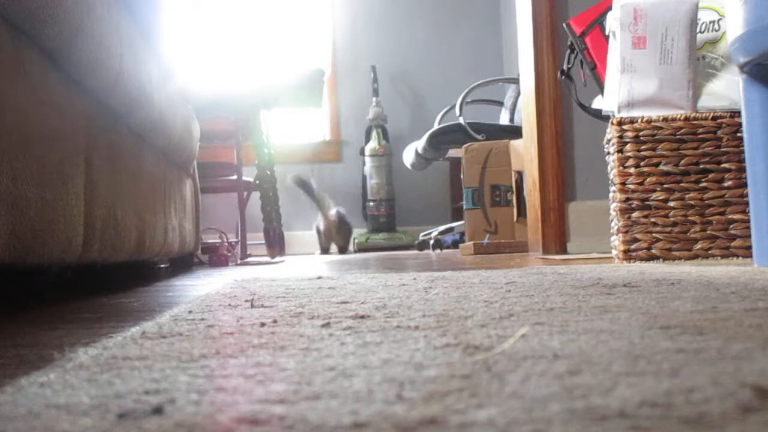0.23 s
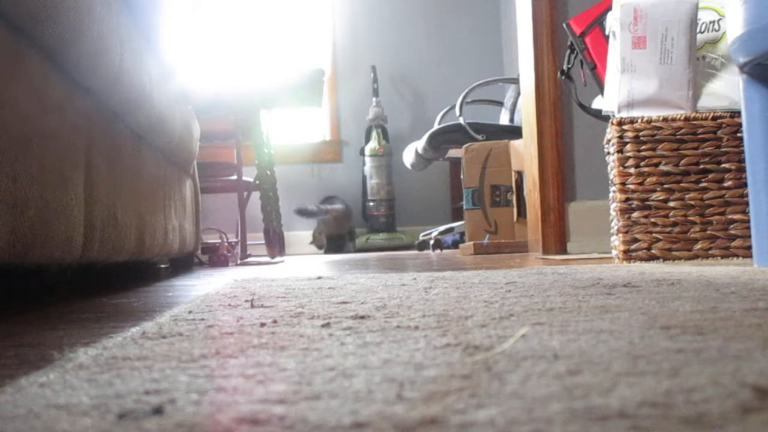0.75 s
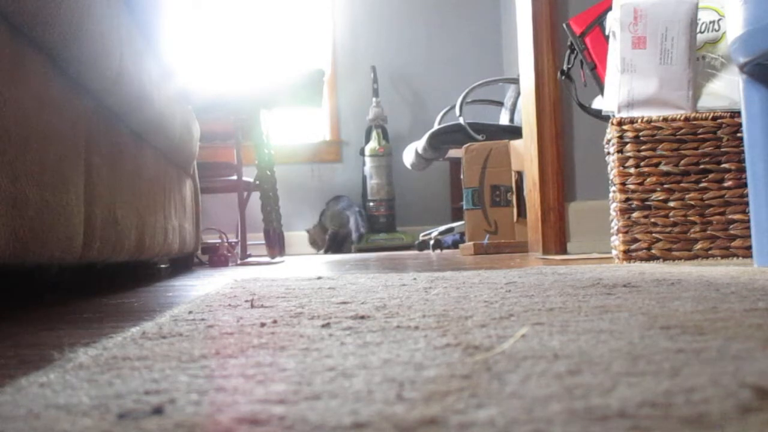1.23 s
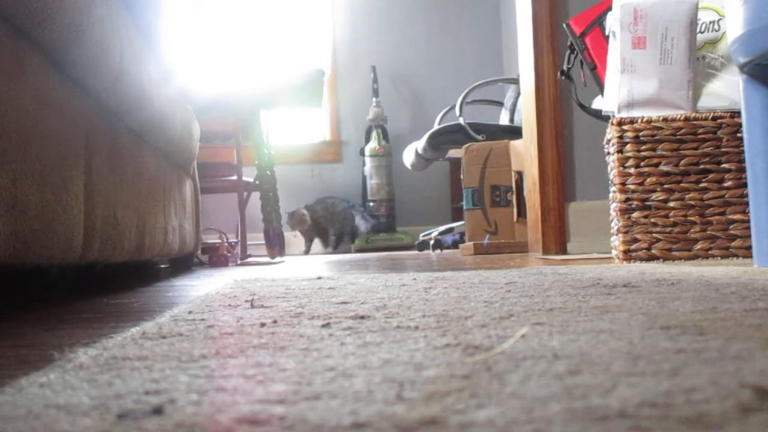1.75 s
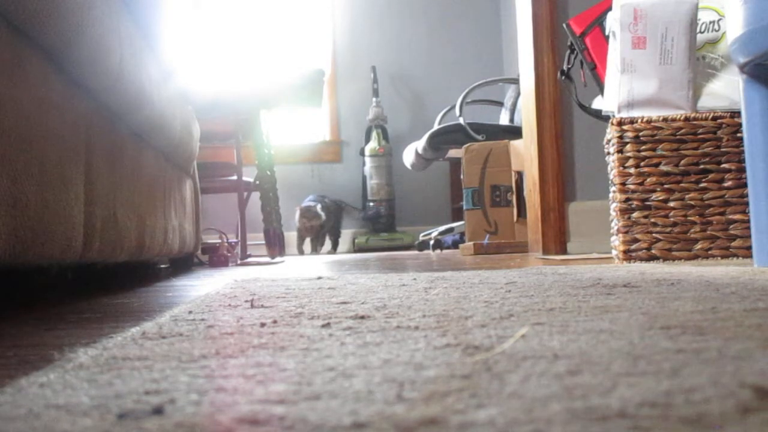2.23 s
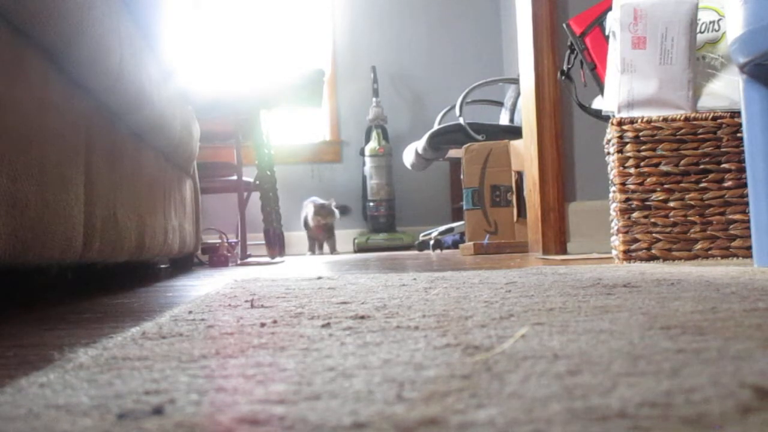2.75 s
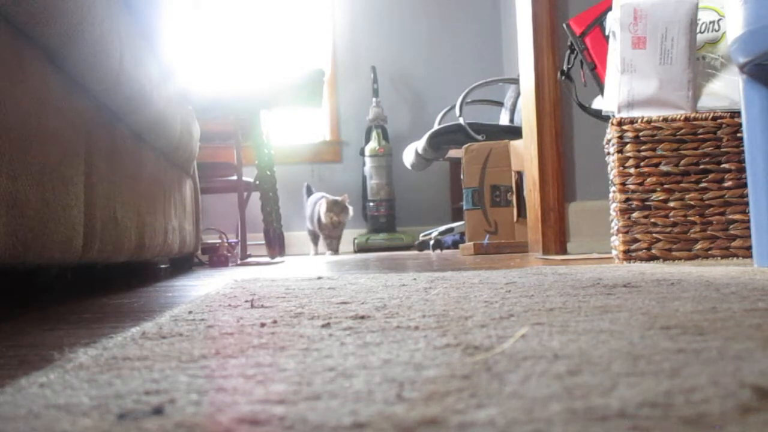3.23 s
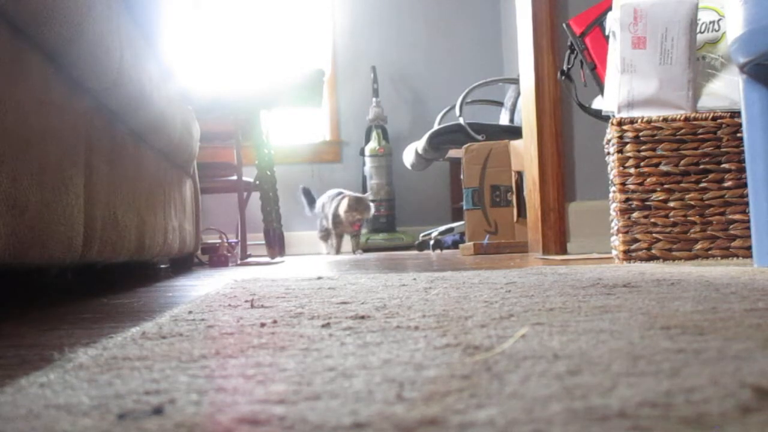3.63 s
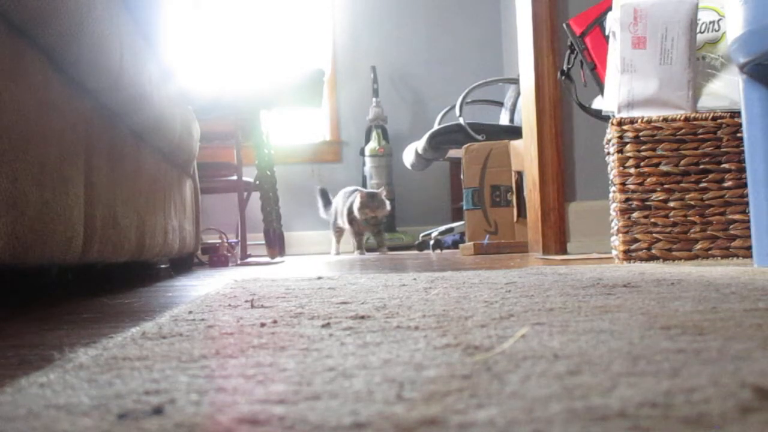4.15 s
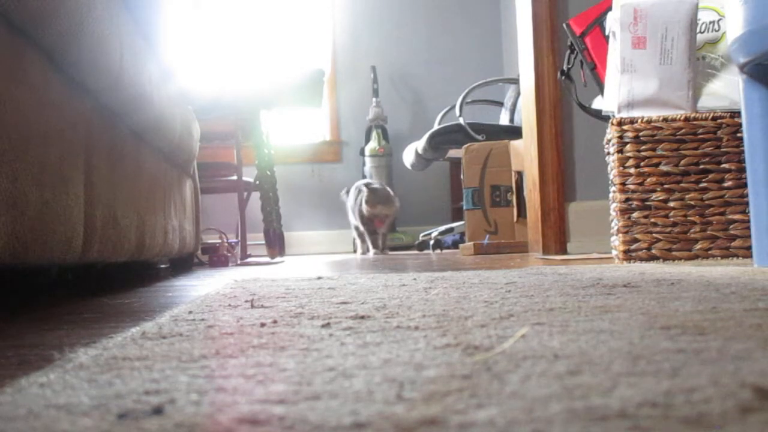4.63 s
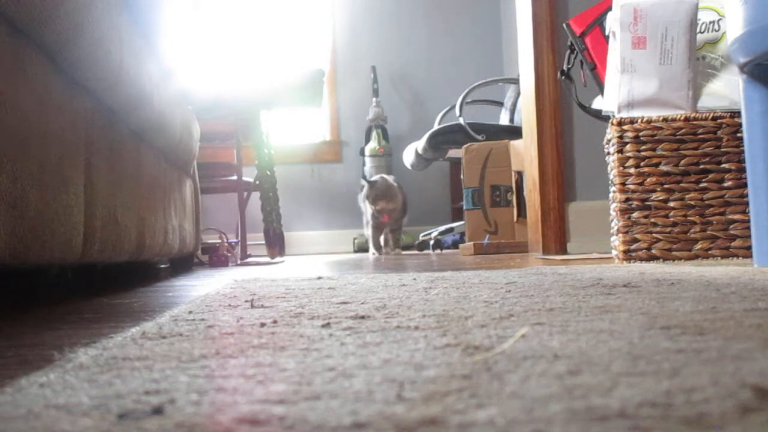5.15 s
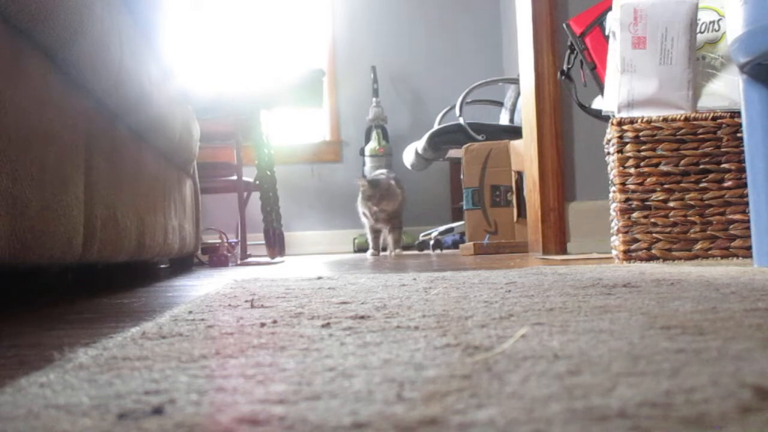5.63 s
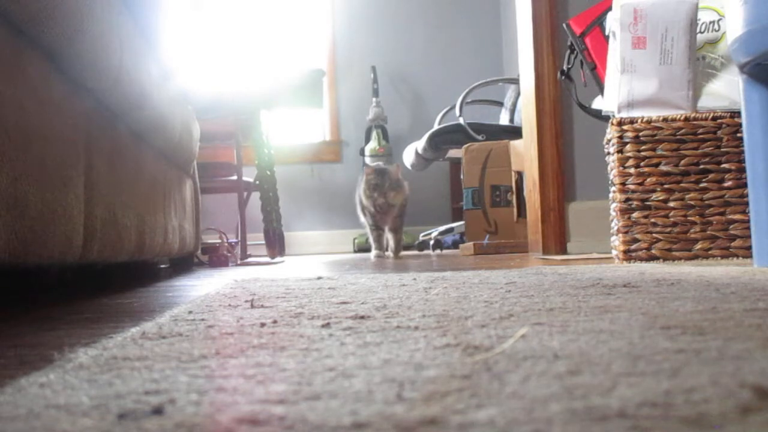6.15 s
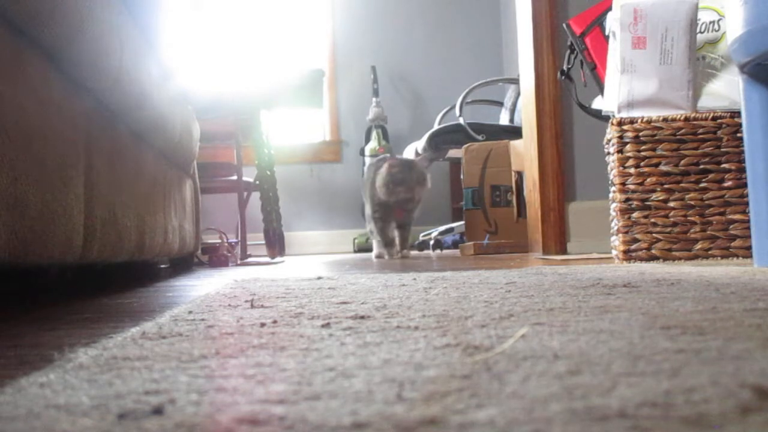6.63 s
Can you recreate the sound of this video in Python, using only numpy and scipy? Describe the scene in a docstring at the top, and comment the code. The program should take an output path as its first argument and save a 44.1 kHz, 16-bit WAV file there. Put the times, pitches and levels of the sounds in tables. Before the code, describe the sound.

Close to the microphone, a hand brushes off its case with a short dry rustle, and the case knocks softly onto carpet within the first half second. A quiet room follows, with a steady low appliance hum. A cat's padded paws make faint, low, irregular thuds on a wooden floor. Outside, a bird gives small falling chirps and an insect pulses thinly, very high and nearly even.

```python
"""A hand brushes off a microphone's case with a short rustle, and the case settles on the carpet with a soft thump.
A cat then pads closer over a wooden floor, each paw a faint low thud under the hum of an appliance.
From outside come a few falling bird chirps and the thin, nearly even pulsing of an insect.
Rubbing is clumpy noise, thuds are fading rings, the hum is a stack of tones, and chirps are gliding tones."""
import sys
import numpy as np
from scipy import signal
from scipy.fft import rfft, irfft
from scipy.io import wavfile

SR = 44100
rng = np.random.default_rng(int(sys.argv[2]) if len(sys.argv) > 2 else 0)


def generate_wav(signal):
    """Clip the signal to [-1, 1] and save it as 16-bit WAV at the path in sys.argv[1]."""
    frames = np.transpose(np.atleast_2d(signal))
    scaled = np.clip(frames, -1, 1) * 32767
    pcm = np.round(scaled).astype(np.int16)
    wavfile.write(sys.argv[1], SR, pcm)


N = 303408
TIME = np.arange(N) / SR   # seconds

# low rumble of the room's still air: pitch_hz, level_db_per_hz
RUMBLE_SPECTRUM = [(12, -74), (22, -63.5), (50, -64.5), (80, -65), (140, -70), (220, -71.5), (340, -74.5),
                   (430, -76), (500, -81.5), (570, -86), (660, -84.5), (755, -96), (830, -90), (1000, -110)]
# soft hiss of the room's still air: pitch_hz, level_db_per_hz
HISS_SPECTRUM = [(760, -108), (900, -93), (980, -84), (1120, -88.5), (1400, -87.5), (1650, -89),
                 (2150, -87.5), (2600, -91.5), (3050, -97), (3900, -96), (5200, -100), (7200, -99),
                 (11000, -104.5), (16000, -114)]
# tones of the appliance motor: multiple_of_speed, rms_level_db
MOTOR_TONES = [(1, -66.5), (2, -50.5), (3, -59.5), (4, -56), (5, -55.5), (6, -55), (7, -53.5), (8, -64),
               (9, -72.5)]
# bird calls: start_s, level_db, first_note_accent_db
BIRD_CALLS = [(.024, -54, -7), (1.054, -54, -1), (1.962, -59, -6), (2.838, -58, -3), (4.049, -55.5, 7)]
# notes of one call: after_start_s, pitch_hz, level_db, fall_hz_per_s, half_length_s, rasp_radians
BIRD_NOTES = [(.014, 4020, 0, 6000, .012, .5), (.040, 3540, 0, 7000, .014, 1.1),
              (.078, 3330, 0, 6000, .013, .9), (.104, 2980, -9, 9000, .012, 1.4)]
# paws on the boards: start_s, peak_db
PAW_STEPS = [(2.498, -28), (2.66, -30), (2.788, -29.5), (2.939, -36), (3.029, -33), (3.542, -35),
             (4.163, -28), (5.735, -29), (5.768, -33), (6.015, -32), (6.308, -33), (6.407, -25.5)]
# ringing of the floor boards: pitch_hz, level_db, fade_by_60_db_s
BOARD_MODES = [(30, 4, 0.039), (51, 3, 0.049), (72.6, -8, 0.053), (120, -10.5, 0.044)]
# the case rocking and settling: start_s, peak_db, contact_s
CASE_KNOCKS = [(.001, -37, 0.0076), (.039, -26, 0.01), (.264, -21.5, 0.0079), (.305, -26, 0.0065),
               (.4625, -23, 0.00049), (.471, -19, 0.0013), (.484, -13, 0.0049), (.502, -19.5, 0.0013),
               (.512, -20, 0.0056), (.557, -28.5, 0.0029)]
# ringing of the case on the floor: pitch_hz, level_db, fade_by_60_db_s
CASE_RINGS = [(88.2, -7, 0.31), (119, 0, 0.043), (170.4, 0, 0.067), (236, -1, 0.075), (319, -1, 0.077),
              (402, -9, 0.096), (483, -8, .08), (590, -10.5, 0.082), (664, -13, 0.037)]
# fingers catch the edge of the case and slip off: start_s, level_db
EDGE_CATCHES = [(.022, -49), (.199, -34)]
# what the scraped edge rings with: pitch_hz, width_hz, level_db
EDGE_RINGS = [(7330, 680, 0), (7700, 740, 6.5), (10650, 600, -1), (11900, 360, 1), (12650, 700, -8),
              (15000, 1000, -5)]
# hollow of the case under the last scuff: pitch_hz, width_hz, level_db
SCUFF_RINGS = [(2060, 350, -2), (2580, 400, -2), (3780, 510, -2), (6100, 530, -4)]
# the hand slides over the case: start_s, length_s, level_db
HAND_SLIDES = [(.002, 0.11, -51.5), (0.201, 0.073, -38.5), (0.286, 0.21, -36.5)]
# tone colour of the sliding friction: pitch_hz, relative_level_db_per_hz
SLIDE_SPECTRUM = [(500, -14), (900, -11), (1400, -10.5), (2000, -5), (2600, 0), (3100, -6.5), (3800, 0.5),
                  (5200, -5), (6500, -1), (9500, -3.5), (11500, -9.5), (13200, -15), (16000, -20)]
# the hand's weight bears on the case: start_s, length_s, level_db
HAND_PRESSES = [(.002, .06, -30.5), (.195, .01, -31), (0.269, .05, -30), (0.501, .02, -29),
                (.675, .01, -36.5)]
# tone colour of the handling rumble: pitch_hz, relative_level_db_per_hz
PRESS_SPECTRUM = [(15, 7), (40, -8.5), (85, 4), (130, -4.5), (200, -10.5), (350, -17.5), (600, -29),
                  (1200, -58)]


def from_db(db):
    """Turn decibels into a gain."""
    return 10 ** (np.asarray(db) / 20)


def rms_one(x):
    """Scale a sound to an average (rms) level of 1."""
    return x / np.sqrt(np.mean(x ** 2) + 1e-20)


def coloured(x, spectrum):
    """Give white noise of unit rms a spectrum in dB per Hz, falling steeply past both ends."""
    hz, db = np.transpose(spectrum)
    octave = np.log2(np.maximum(np.fft.rfftfreq(N, 1 / SR), 1))
    inside = np.clip(octave, np.log2(hz[0]), np.log2(hz[-1]))
    octaves_outside = np.abs(octave - inside)
    level_db = np.interp(octave, np.log2(hz), db) - 40 * octaves_outside
    return irfft(rfft(x) * from_db(level_db), N) * np.sqrt(SR / 2)


def noise_band(hz, width_hz):
    """Noise in one bell-shaped band around a pitch; unit rms."""
    bell = np.exp(-2 * ((np.fft.rfftfreq(N, 1 / SR) - hz) / width_hz) ** 2)
    return rms_one(irfft(rfft(rng.standard_normal(N)) * bell, N))


def drift(rate):
    """Smooth random wandering, changing about rate times a second; unit rms."""
    return noise_band(0, 2 * rate)


def resonance(x, hz, width_hz):
    """A two-pole resonance: it favours one pitch, with a gain of 1 at its top."""
    r = np.exp(-np.pi * width_hz / SR)
    feed = np.array([1, 0, -1]) * (1 - r * r) / 2
    feedback = [1, -2 * r * np.cos(2 * np.pi * hz / SR), r * r]
    return signal.lfilter(feed, feedback, x)


def envelope(start, length, db, attack_s, release_db_per_s, sag_db_per_s=0):
    """Gain over time: a smooth attack ending at start, a hold that may sag, then a release."""
    t = TIME - start
    attack = np.sin(np.pi / 2 * np.clip(1 + t / attack_s, 0, 1)) ** 2
    sag_db = sag_db_per_s * np.clip(t, 0, length)
    release_db = release_db_per_s * np.maximum(t - length, 0)
    return attack * from_db(db - sag_db - release_db)


def bump(s, half_length_s):
    """A bell-shaped swell of height 1 around a moment."""
    return np.exp(-((TIME - s) / half_length_s) ** 2)


def blows(rows, modes, vary_db):
    """Soft contacts ring a body; a longer contact leaves out its higher modes."""
    out, t = np.zeros(N + SR), TIME[:SR // 2]
    hz, db, t60 = np.transpose(modes)
    sign = (-1) ** np.arange(len(modes))   # neighbouring modes swing in opposite directions
    fades = np.exp(-np.log(1000) * t / t60[:, None])
    rings = np.sin(2 * np.pi * hz[:, None] * t) * fades
    chances = rng.standard_normal((len(rows), len(modes)))
    for (s, peak_db, contact), chance in zip(rows, chances):
        push = np.sin(np.pi * np.minimum(t / contact, 1)) ** 2
        ringing = (sign * from_db(db + vary_db * chance)) @ rings
        blow = signal.fftconvolve(ringing, push)[:len(t)]
        start = max(round(s * SR), 0)
        out[start:start + len(t)] += from_db(peak_db) * blow / np.abs(blow).max()
    return out[:N]


def friction(grain_db, grains_per_s):
    """Countless tiny slips that come in clumps: white noise of unsteady level; unit rms."""
    return rms_one(rng.standard_normal(N) * from_db(grain_db * drift(grains_per_s)))


def rubbed(modes):
    """Friction makes a set of modes ring, each filtered twice for a sharper peak; unit rms."""
    slips = friction(grain_db=2.5, grains_per_s=270)
    rings = 0
    for hz, width_hz, db in modes:
        once = resonance(slips, hz, width_hz)
        rings = rings + from_db(db) * resonance(once, hz, width_hz)
    return rms_one(rings)


def room_air():
    """Steady rumble and hiss, and a deep drone that swells up in the building and eases."""
    rumble = coloured(rng.standard_normal(N), RUMBLE_SPECTRUM)
    hiss = coloured(rng.standard_normal(N), HISS_SPECTRUM)
    drone_gain = envelope(5.35, 0, db=-45, attack_s=.7, release_db_per_s=3.5)
    drone = drone_gain * noise_band(55.2, width_hz=12)
    swell = from_db(-44) * bump(7.2, half_length_s=0.08) * noise_band(251, width_hz=49)
    return rumble + hiss + drone + swell


def appliance(motor_hz=59.24, wander_hz=0.1041, waver_db=0.75, mains_hum_hz=120.74):
    """A motor slips just behind the mains, so its second harmonic beats with the hum; its fan blurs a tone."""
    turns = np.cumsum(motor_hz + wander_hz * drift(1.7)) / SR
    motor = 0
    for multiple, db in MOTOR_TONES:
        gain = from_db(db + waver_db * drift(1.4))
        motor = motor + gain * np.sin(2 * np.pi * (round(multiple) * turns + rng.random()))
    mains = from_db(-49.5) * np.sin(2 * np.pi * (mains_hum_hz * TIME + rng.random()))
    fan = from_db(-58) * noise_band(273.1, width_hz=5)
    return np.sqrt(2) * (motor + mains) + fan   # the root of 2 turns rms levels into sine heights


def insect(period_s=.17536, jitter_s=.008, vary_db=1, stroke_half_length_s=0.039):
    """Each wing stroke rasps a narrow, very high resonance, a little off in time and strength."""
    beats = np.arange(.637, N / SR, period_s)
    chances = rng.standard_normal((len(beats), 2))
    strokes = 0
    for s, (late, push) in zip(beats, chances):
        stroke = bump(s + jitter_s * late, stroke_half_length_s)
        strokes = strokes + from_db(vary_db * push) * stroke
    return from_db(-72) * strokes * noise_band(10450, width_hz=280)


def bird(echo_t60_s=0.13, echo_db=-4):
    """A distant call steps down through four short, raspy, falling notes, blurred by reflections."""
    song, flutter = np.zeros(N), drift(130)
    for s, call_db, accent_db in BIRD_CALLS:
        for k, (after, hz, note_db, fall, half_length, rasp) in enumerate(BIRD_NOTES):
            t = TIME - s - after
            near = np.abs(t) < half_length * np.pi   # only compute where the note is heard
            t = t[near]
            phase = 2 * np.pi * (hz - fall * t / 2) * t + rasp * flutter[near]
            gain = from_db(call_db + note_db + accent_db * (k == 0))
            song[near] += gain * np.exp(-(t / half_length) ** 2) * np.sin(phase)
    echo_fade = np.exp(-np.log(1000) * TIME[:SR // 2] / echo_t60_s)
    echoes = rng.standard_normal(SR // 2) * echo_fade
    echoes = echoes / np.linalg.norm(echoes)
    return song + from_db(echo_db) * signal.fftconvolve(song, echoes)[:N]


def cat(pad_contact_s=0.0073):
    """Padded paws press slowly, so mainly the lowest modes of the boards answer."""
    steps = [(s, db, pad_contact_s) for s, db in PAW_STEPS]
    return blows(steps, BOARD_MODES, vary_db=1.5)


def strongest(envelopes):
    """Follow whichever gain is highest at each moment."""
    return np.max(envelopes, axis=0)


def hand():
    """Skin catches the edge of the case and slides off it, while the case rumbles and knocks on the floor."""
    catching = strongest([envelope(s, 0, db, attack_s=.016, release_db_per_s=340)
                          for s, db in EDGE_CATCHES])
    sliding = strongest([envelope(*row, attack_s=0.021, release_db_per_s=210, sag_db_per_s=38)
                         for row in HAND_SLIDES])
    pressing = strongest([envelope(*row, attack_s=0.023, release_db_per_s=148)
                          for row in HAND_PRESSES])
    # a last, duller scuff as the hand lets go
    letting_go = envelope(.45, 0, db=-40, attack_s=0.015, release_db_per_s=290)
    scrapes = catching * rubbed(EDGE_RINGS) + letting_go * rubbed(SCUFF_RINGS)
    brush = rms_one(coloured(friction(grain_db=1.0, grains_per_s=120), SLIDE_SPECTRUM))
    weight = rms_one(coloured(rng.standard_normal(N), PRESS_SPECTRUM))
    knocks = blows(CASE_KNOCKS, CASE_RINGS, vary_db=1.5)
    return scrapes + sliding * brush + pressing * weight + knocks


def scene():
    """Everything that reaches the microphone on the carpet."""
    background = room_air() + appliance() + insect() + bird()
    return (background + cat() + hand())[None]


def record(dry, notch_hz=4670, notch_width_hz=1050, notch_db=-10.5, cutoff_hz=15720):
    """The microphone's port cuts a notch in the treble; the top is cut steeply."""
    notch_band = resonance(dry, notch_hz, notch_width_hz)
    port = dry - (1 - from_db(notch_db)) * notch_band
    top_cut = signal.ellip(12, .1, 80, cutoff_hz, fs=SR, output="sos")
    return signal.sosfilt(top_cut, port)


dry = scene()
out = record(dry)
generate_wav(out)
```